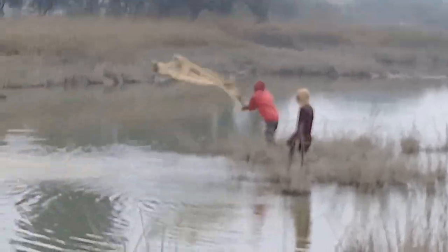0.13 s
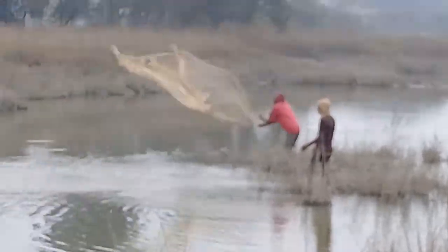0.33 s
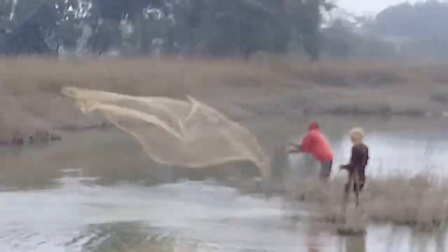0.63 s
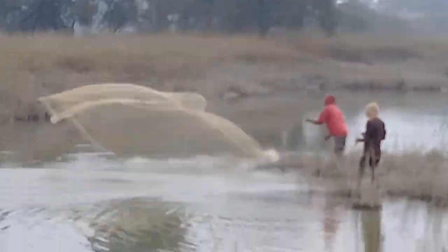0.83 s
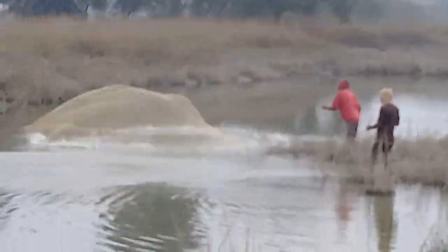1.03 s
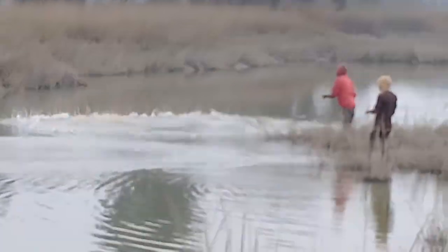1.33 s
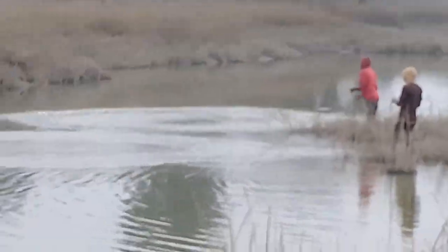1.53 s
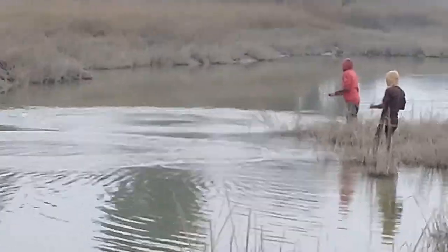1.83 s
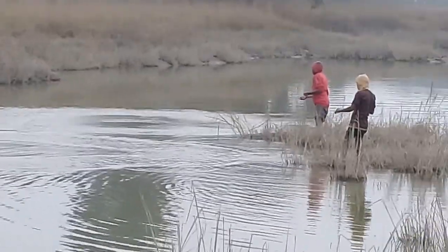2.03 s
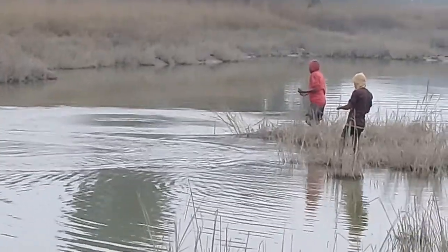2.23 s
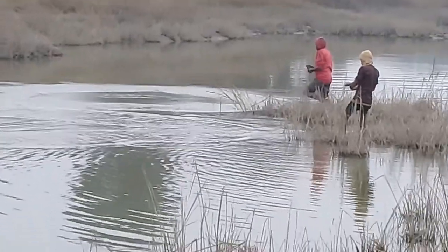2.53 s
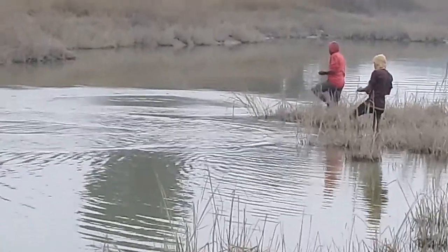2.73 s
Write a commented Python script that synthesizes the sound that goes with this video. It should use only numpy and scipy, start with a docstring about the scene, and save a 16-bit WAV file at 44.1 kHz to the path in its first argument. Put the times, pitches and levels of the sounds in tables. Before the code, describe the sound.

Gusty wind rumbles and thumps on the microphone as a cast net lands softly on a pond

```python
"""A cast net swishes out over a pond, with fine spray: coloured patter of tiny impacts under level curves.
From about 0.9 s its rim weights plip in as ringing bubbles and the mesh lands in a soft wash, which then dulls.
Faint dry rustles come and go: short swells of brighter patter.
Wind rumbles on the microphone throughout, in buffets and single thumps, stronger and brighter towards the end:
an eddy pattern read faster or slower, rounded and coloured by the port. Quiet open air lies beneath."""
import sys
import numpy as np
from scipy import signal
from scipy.fft import rfft, irfft, next_fast_len
from scipy.io import wavfile
from scipy.ndimage import uniform_filter1d, map_coordinates

SR = 44100
rng = np.random.default_rng(int(sys.argv[2]) if len(sys.argv) > 2 else 0)


def wav_out(sig):
    """Save sig, one row per channel (or a flat mono array), as 16-bit PCM at SR to the path in sys.argv[1]."""
    wavfile.write(sys.argv[1], SR, np.round(np.clip(np.atleast_2d(sig).T, -1, 1) * 32767).astype(np.int16))


N = 127008

# net in the air: t/s, level/dB
SWISH_LEVEL = [(0, -42), (.1, -45.5), (.175, -40.5), (.205, -46), (.3, -50), (.45, -53), (.54, -49),
               (.65, -51), (.73, -60.5), (.88, -67.5), (1, -92)]
# spectrum of the swish: f/Hz, gain/dB
SWISH_COLOUR = [(500, -5.5), (900, 1.5), (1200, -9), (1450, 1), (1700, 0.5), (2000, -8), (2400, 0.5),
                (2750, -9), (3050, -8), (3600, -13.5), (5200, -16.5), (6100, -17), (7500, -25),
                (9000, -37.5), (15000, -39)]
# net on the water: t/s, level/dB
WASH_LEVEL = [(.89, -71), (.92, -52), (1.02, -46), (1.17, -46), (1.26, -43.5), (1.33, -47.5), (1.39, -52.5),
              (1.5, -55), (1.62, -50.5), (1.78, -57), (1.95, -68.5), (2.3, -83)]
# spectrum of the wash: f/Hz, gain/dB
WASH_COLOUR = [(500, -1), (900, 2.5), (1170, -8), (1400, 1), (1700, -2.5), (1920, -11.5), (2100, -0.5),
               (2330, 0), (2520, -10.5), (2800, -7), (3200, -14.5), (3700, -12), (5300, -14.5),
               (6000, -10.5), (7000, -22.5), (8000, -25.5), (9200, -42), (12000, -37), (14000, -36.5),
               (16000, -39)]
# rim weights plip into the water: t/s, level/dB, starting bubble f/Hz
PLIPS = [(.915, -40.5, 1392), (.953, -39, 1490), (0.999, -37.5, 1340), (1.055, -38, 2130),
         (1.222, -38.5, 1450), (1.271, -31.5, 1501), (1.329, -35, 1360)]
# fine spray, off the thrown net and as the mesh lands: middle t/s, half-length/s, level/dB
SPRAY = [(.09, 0.075, -55.5), (.166, 0.046, -53), (1.226, .07, -53.5)]
# spectrum of the spray: f/Hz, gain/dB
SPRAY_COLOUR = [(2500, -16), (4000, 3), (6200, 1), (8800, -14.5), (10300, -10.5), (11700, -19), (13600, -7),
                (16000, -15.5)]
# faint dry rustles: middle t/s, half-length/s, level/dB
RUSTLES = [(.43, 0.021, -62), (.603, .028, -61.5), (.76, 0.12, -65.5), (.808, 0.018, -59.5),
           (.862, 0.025, -63), (1.348, .012, -62.5), (1.745, 0.024, -64), (2.152, 0.013, -64.5)]
# spectrum of the rustles: f/Hz, gain/dB
RUSTLE_COLOUR = [(3000, -26.5), (5000, -10.5), (5700, 3), (7200, -4.5), (8600, -21.5), (12000, -30)]
# wind ahead of the port: t/s, level/dB, top of the rumble f/Hz
WIND = [(0, -20.5, 169), (.09, -26, 164.8), (.16, -14.5, 182.1), (.21, -25.5, 186), (.275, -14, 200.4),
        (.41, -17.5, 225.2), (.49, -21.5, 204.6), (.55, -26, 185.5), (.77, -21, 199.3), (.88, -24, 199.8),
        (.96, -23, 174.8), (1.05, -16.5, 200.9), (1.17, -28.5, 214.6), (1.26, -25, 269.8),
        (1.47, -25, 225.1), (1.54, -39.5, 164.6), (1.66, -26.5, 204.8), (1.88, -20.5, 270.3),
        (2.12, -19, 305.4), (2.29, -19.5, 291.1), (2.44, -14, 326.1), (2.55, -18, 374.3),
        (2.74, -13.5, 369), (2.88, -16, 379.7)]
# buffets, short bursts of turbulence: middle t/s, half-length/s, level/dB, top of the rumble f/Hz
BUFFETS = [(0.407, 0.024, -16, 289.6), (0.606, .012, -24, 501), (1.227, 0.0075, -20.5, 388.9),
           (1.253, 0.036, -16.5, 320.4), (1.317, 0.018, -13, 360), (1.352, 0.018, -15, 311.2),
           (1.454, 0.011, -11.5, 382.1), (1.576, 0.017, -17, 259.5), (1.638, 0.019, -14, 225.1),
           (1.731, .038, -11, 440.4), (1.845, 0.018, -12, 369), (1.868, 0.016, -14.5, 494.7),
           (1.935, 0.015, -12.5, 429), (2.013, .014, -10.5, 475.7), (2.097, 0.013, -13.5, 422.2),
           (2.119, 0.015, -12, 428.2), (2.142, 0.011, -16.5, 500.6), (2.185, 0.015, -16, 513.2),
           (2.237, 0.0084, -14, 480.2), (2.344, 0.013, -13, 429.2), (2.416, .024, -10.5, 347.8),
           (2.446, 0.017, -9, 399.6), (2.489, .008, -11.5, 503), (2.511, .014, -11, 700.1),
           (2.551, .012, -14, 538), (2.578, .012, -14, 615.5), (2.628, 0.023, -10.5, 468.4),
           (2.691, .008, -13.5, 571), (2.719, 0.015, -9.5, 404.3), (2.749, .016, -8, 518.3),
           (2.766, 0.009, -12, 512), (2.797, .01, -14, 464.2), (2.845, .018, -10, 424.9)]
# thumps, single eddies that hit the port: t/s, level/dB, sharpness f/Hz
THUMPS = [(0.2176, -2, 392), (0.691, -15, 239.1), (.725, -14.5, 268.8), (1.406, -4, 434), (1.48, -8, 329),
          (1.799, -2, 402), (1.98, -4, 556), (2.705, -9, 480)]
# turbulence whose rumble tops out at EDDY_TOP_HZ: f/Hz, gain/dB
EDDY_COLOUR = [(20, -4.5), (120, 0), (250, -1.5), (400, -5), (600, -13), (900, -23.5), (1400, -37.5),
               (2200, -54.5), (4000, -86.5), (9000, -115)]
# how the microphone port passes wind pressure: f/Hz, gain/dB
PORT_RESPONSE = [(20, -28), (40, -10.5), (65, -4), (100, 0), (135, 3), (200, 2.5), (400, -0.5),
                 (1000, -4.5), (2000, -7), (3500, -14.5), (8000, -44)]
# spectrum of the open air: f/Hz, gain/dB
AIR_COLOUR = [(200, 0), (1000, -3.5), (2600, -10), (3300, -19), (6000, -19), (8000, -24), (15000, -22.5)]

DROPS_PER_S, DROP_SPREAD_DB, DROP_MAX_DB = 3500, 4, 16
SMOOTH_POWER_SHARE = 0.24  # hiss in the patter
MESH_LANDS_S, WASH_DULLS_DB_PER_S, WASH_DULL_HZ = 1.1, 8, 3040
SPLATTER_PER_S, SPLATTER_DB = 65, 1
PLIP_DECAY_S, PLIP_RISE_PER_S = .004, 7.8  # rise as a fraction of the starting pitch
EDDY_TOP_HZ = 400
FLUTTER_PER_S, FLUTTER_DB, FLUTTER_OCTAVES = 110, 2.5, .15
BUFFET_EDGE = 3.2  # steepness of rise and fall: 2 = bell, more = squarer
THUMP_WAKE_DB, WAKE_S, WAKE_TOP_HZ = -6.5, 0.0067, 260.7
OVERLOAD_DB = -1  # the port rounds off pressure peaks near this level
AIR_DB = -66.5
RECORDER_TOP_HZ = 15700


def net():
    """Swish of the throw, then plips and an uneven wash whose highs fade as the water settles; spray."""
    swish = colour(patter(), SWISH_COLOUR) * undb(curve(SWISH_LEVEL))
    wash = colour(patter(), WASH_COLOUR) * undb(curve(WASH_LEVEL))
    lowpass = signal.butter(2, WASH_DULL_HZ, fs=SR, output="sos")
    low = signal.sosfiltfilt(lowpass, wash)
    high = wash - low
    settling_s = np.maximum(np.arange(N) / SR - MESH_LANDS_S, 0)
    # lows and highs splatter independently
    body = low * undb(SPLATTER_DB * walk(SPLATTER_PER_S))
    fizz_db = SPLATTER_DB * walk(SPLATTER_PER_S) - WASH_DULLS_DB_PER_S * settling_s
    fizz = high * undb(fizz_db)
    return swish + body + fizz + plips() + bursts(SPRAY, SPRAY_COLOUR)


def plips():
    """Small bubbles that ring briefly and rise in pitch."""
    out = np.zeros(N)
    for at_s, db, hz in PLIPS:
        t = np.maximum(np.arange(N) / SR - at_s, 0)
        ring = np.exp(-t / PLIP_DECAY_S) - np.exp(-10 * t / PLIP_DECAY_S)
        cycles = hz * t * (1 + PLIP_RISE_PER_S * t / 2)
        out += undb(db) * ring * np.sin(2 * np.pi * cycles)
    return out


def patter():
    """Countless tiny impacts of uneven size and random sign over a smooth hiss."""
    size_db = np.minimum(DROP_SPREAD_DB * rng.exponential(size=N), DROP_MAX_DB)
    struck = rng.random(N) < DROPS_PER_S / SR
    hits = struck * rng.choice([-1, 1], N) * undb(size_db)
    hiss = rng.standard_normal(N)
    return np.sqrt(1 - SMOOTH_POWER_SHARE) * unit(hits) + np.sqrt(SMOOTH_POWER_SHARE) * hiss


def bursts(rows, points):
    """Short swells of patter in one colour."""
    level = sum(undb(db) * swell(middle_s, half_s) for middle_s, half_s, db in rows)
    return colour(patter(), points) * level


def rustles():
    """Faint dry rustles: brief bursts of bright patter."""
    return bursts(RUSTLES, RUSTLE_COLOUR)


def wind():
    """Rumble and thumps, rounded and coloured by the microphone port."""
    limit = undb(OVERLOAD_DB)
    rounded = limit * np.tanh((rumble() + thumps()) / limit)
    return equalise(rounded, PORT_RESPONSE)


def rumble():
    """Fluttering wind; buffets add power and pull the rumble's top to their power-weighted mean."""
    flutter = 2 * np.tanh(walk(FLUTTER_PER_S) / 2)
    power = undb(curve(WIND) + FLUTTER_DB * flutter) ** 2
    weighted_hz = power * curve(WIND, axis=2) * 2 ** (FLUTTER_OCTAVES * flutter)
    for middle_s, half_s, db, hz in BUFFETS:
        burst_power = (undb(db) * swell(middle_s, half_s, BUFFET_EDGE)) ** 2
        power = power + burst_power
        weighted_hz = weighted_hz + burst_power * hz
    return np.sqrt(power) * turbulence(weighted_hz / power)


def thumps():
    """Each eddy swings the pressure up and sharply down, and leaves a short ragged wake."""
    swings, wakes = np.zeros(N), np.zeros(N)
    for at_s, db, hz in THUMPS:
        turn = 2 * np.pi * hz * (np.arange(N) / SR - at_s)
        swings -= undb(db) * turn * np.exp(-turn ** 2 / 2)
        wakes += undb(db) * swell(at_s + WAKE_S * 2 / 3, WAKE_S)
    return swings + undb(THUMP_WAKE_DB) * wakes * turbulence(np.full(N, WAKE_TOP_HZ))


def turbulence(top_hz):
    """Eddy pattern swept past the port: the faster the air, the higher its rumble reaches."""
    pattern = colour(rng.standard_normal(2 * N), EDDY_COLOUR)
    # even out the running power
    span = int(SR * 4 / EDDY_TOP_HZ)
    power = uniform_filter1d(uniform_filter1d(pattern ** 2, span), span)
    pattern = pattern / np.sqrt(power)
    position = np.cumsum(top_hz / EDDY_TOP_HZ)
    return map_coordinates(pattern, [position], mode="mirror")


def open_air():
    """Quiet steady noise in the colour of open air."""
    return undb(AIR_DB) * colour(rng.standard_normal(N), AIR_COLOUR)


def undb(db):
    """Decibels to gain."""
    return 10 ** (np.asarray(db) / 20)


def unit(x):
    """Scale to rms 1."""
    return x / np.sqrt(np.mean(x ** 2))


def curve(rows, axis=1):
    """One column of a table, joined by straight lines in time."""
    rows = np.array(rows, float)
    return np.interp(np.arange(N) / SR, rows[:, 0], rows[:, axis])


def swell(middle_s, half_s, edge=2):
    """Smooth rise and fall, down to exp(-2) at half_s from the middle for edge 2."""
    offset = (np.arange(N) / SR - middle_s) / half_s
    return np.exp(-np.abs(offset * np.sqrt(2)) ** edge)


def walk(rate_per_s):
    """Smooth random wander, rms 1: random steps under a moving average."""
    k = max(int(SR / rate_per_s), 2)
    steps = np.repeat(rng.standard_normal(N // k + 1), k)
    return unit(uniform_filter1d(steps, k)[:N])


def colour(x, points):
    """Give a sound a spectrum, at rms 1."""
    return unit(equalise(x, points))


def equalise(x, points):
    """Filter by a gain curve of f/Hz, gain/dB points that falls away below the first."""
    hz, db = np.array(points, float).T
    size = next_fast_len(len(x) + SR // 10)
    f = np.maximum(np.arange(size // 2 + 1) * SR / size, 1)
    gain = undb(np.interp(np.log(f), np.log(hz), db))
    gain = gain * np.minimum(f / hz[0], 1) ** 2
    return irfft(rfft(x, size) * gain, size)[:len(x)]


def scene():
    """Net, rustles and wind over quiet open air, as one channel."""
    return (net() + rustles() + wind() + open_air())[None]


def record(dry):
    """The recorder cuts the top with a steep low-pass."""
    lowpass = signal.ellip(8, .2, 70, RECORDER_TOP_HZ, fs=SR, output="sos")
    return signal.sosfilt(lowpass, dry)


dry = scene()
out = record(dry)
wav_out(out)
```